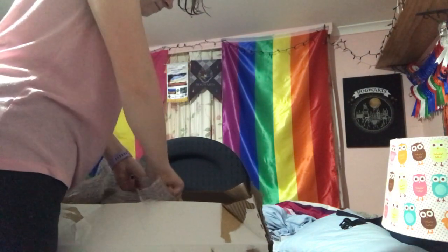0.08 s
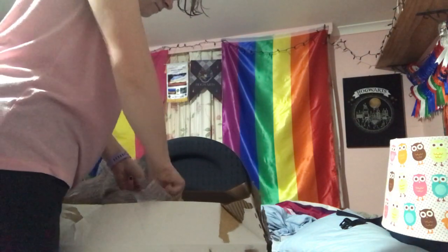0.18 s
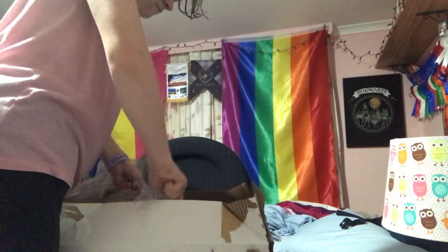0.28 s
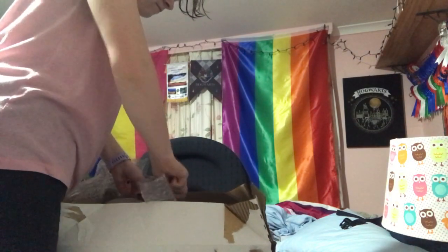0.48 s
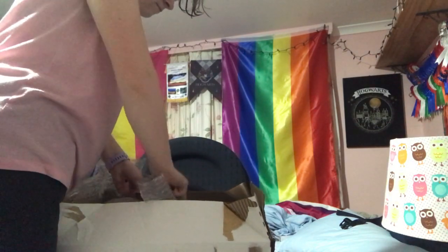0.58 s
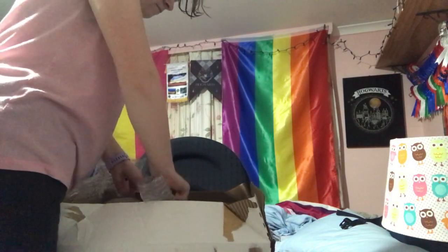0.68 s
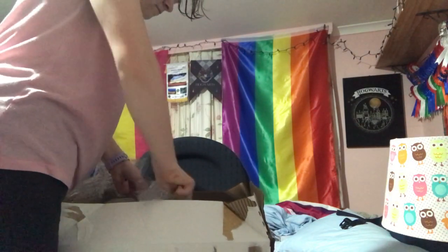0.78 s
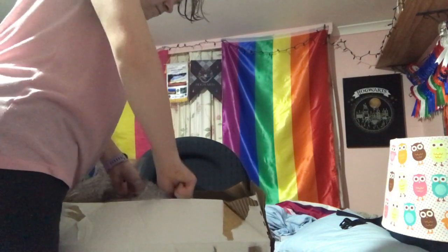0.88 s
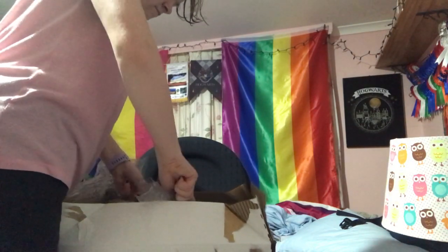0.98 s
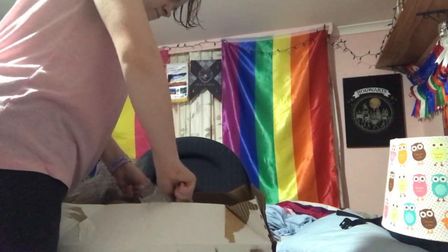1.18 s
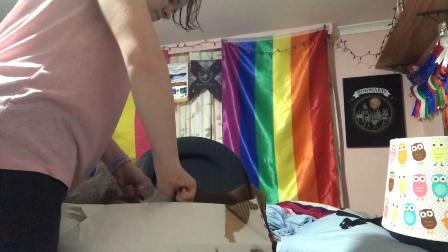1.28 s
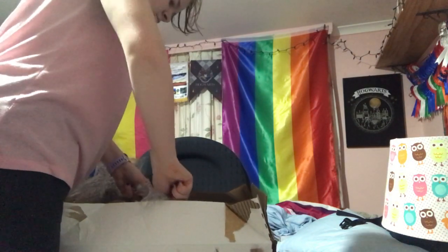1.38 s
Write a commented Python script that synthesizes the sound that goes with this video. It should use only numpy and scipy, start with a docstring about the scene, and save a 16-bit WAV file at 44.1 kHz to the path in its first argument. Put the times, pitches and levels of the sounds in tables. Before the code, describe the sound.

Packing paper crinkles and snaps in a cardboard box, with dull knocks on its walls

```python
"""Hands pull packing paper about in a cardboard box in a small furnished bedroom, near a camera.
Over a quiet floor of filtered noise, the paper first rustles softly: dense tiny crackles on a smooth hiss.
Near 0.2 s it grows loud; creases snap as pops with noise bursts, and knocks ring the box dully.
The rustle sinks away, bursts out again near 0.79 s, then goes on more softly with small snaps and knocks.
The room answers throughout with a short tail of fading noise."""
import sys
import numpy as np
from scipy import signal
from scipy.fft import rfft, irfft, next_fast_len
from scipy.io import wavfile
from scipy.ndimage import map_coordinates

SR = 44100
rng = np.random.default_rng(int(sys.argv[2]) if len(sys.argv) > 2 else 0)


def boost_factor(decibels):
    """Convert a level in decibels to a linear amplitude factor."""
    exponent = np.asarray(decibels, float) / 20
    return 10 ** exponent


def unload_audio(sound):
    """Save the sound as a 16-bit wav file, at the path given as the first command line argument."""
    columns = np.transpose(np.atleast_2d(sound))
    # keep every value between -1 and 1, then stretch to whole-number steps
    steps = np.round(np.clip(columns, -1, 1) * 32767)
    wavfile.write(sys.argv[1], SR, steps.astype(np.int16))


N = 61740


def unit(x):
    """Bring to rms 1."""
    return x / np.sqrt(np.mean(x ** 2) + 1e-20)


def along(points, hz):
    """Read a curve of (f/Hz, value) points on a log frequency axis."""
    f, v = np.transpose(points)
    return np.interp(np.log(hz + 1), np.log(f + 1), v)


def coloured(x, gain):
    """Filter x to the given gain of frequency, with no sound before its cause (minimum phase)."""
    m = 2 * next_fast_len(N // 2 + 4096)
    cepstrum = irfft(np.log(gain(np.fft.rfftfreq(m, 1 / SR)) + 1e-6), m)
    cepstrum[1:m // 2] *= 2
    cepstrum[m // 2 + 1:] = 0
    return irfft(rfft(x, m) * np.exp(rfft(cepstrum)), m)[:N]


def wobble(rate):
    """A smooth random curve, rate knots a second."""
    knots = rng.standard_normal(int(N * rate / SR) + 4)
    return map_coordinates(knots, [np.arange(N) * rate / SR])


def place(times, sounds):
    """Sum one row of samples per event at its time."""
    start = np.round(np.asarray(times) * SR).astype(int)[:, None]
    at = start + np.arange(sounds.shape[1])
    return np.bincount(at.ravel(), sounds.ravel(), N + SR)[:N]


# Colour of the quiet room tone: f/Hz, relative level/dB per Hz
FLOOR_COLOUR = [(15, -48), (25, 8.5), (130, 0), (223, -5), (1130, -11.5), (1940, -16.5), (2840, -21),
                (10400, -25), (12200, -24), (16000, -28)]


def room_tone():
    """The quiet floor: steady noise, strongest in the bass."""
    noise = coloured(rng.standard_normal(N), lambda hz: boost_factor(along(FLOOR_COLOUR, hz)))
    floor_db = -59  # rms, before the microphone
    return boost_factor(floor_db) * unit(noise)


# How long the room rings: f/Hz, time to fall by 60 dB/s
ROOM_DECAY = [(200, 0.37), (1500, 0.17), (6000, 0.11), (14000, 0.42)]


def room(x):
    """The room's answer: a scattered, fading tail, drawn anew for every tenth of a second of sound."""
    room_db, gap_s = -5.5, 0.003  # tail energy against the direct sound; wait before the tail
    out, step = np.zeros(N + 2 * SR), SR // 10
    gap = round(gap_s * SR)
    for a in range(0, N, step):
        hz, t, z = signal.stft(rng.standard_normal(SR // 3), SR, nperseg=256)
        fade = boost_factor(-60 * t / along(ROOM_DECAY, hz)[:, None])
        tail = signal.istft(z * fade, SR, nperseg=256)[1]
        wet = signal.fftconvolve(x[a:a + step], tail / np.linalg.norm(tail))
        out[a + gap:][:len(wet)] += wet
    return boost_factor(room_db) * out[:N]


# Ways the box can ring: f/Hz, relative level/dB, time to fall by 60 dB/s
BOX_MODES = [(68, -4.5, 0.076), (100, -11.5, 0.047), (156.8, -9, 0.076), (245, 0, 0.077), (303.5, 1, 0.047),
             (453.7, 0.5, 0.067), (527.3, 3.5, 0.052), (620, 4.5, 0.054), (800, 5.5, 0.037),
             (976, 7, 0.021), (1200, 9.5, 0.03), (1380, 6.5, 0.038), (1757, 8.5, 0.027), (2730, 5, 0.018)]
# Knocks on the box: t/s, relative peak level/dB, centre of the modes it excites f/Hz
BOX_KNOCKS = [(0.2072, -23.5, 1260), (.2085, -23, 435), (.228, -24, 1200), (0.2536, -47, 1320),
              (.2595, -11, 456), (.272, -20, 527), (.288, -17, 245), (.313, -17.5, 875),
              (0.346, -25.5, 245), (.356, -24.5, 510), (.409, -37, 504), (.7425, -23, 800),
              (.752, -36.5, 310), (0.7847, -16, 1420), (.787, -16.5, 624), (.798, -24, 530),
              (.803, -31, 116.6), (.822, -43, 620), (.848, -28, 830), (.854, -24.5, 463), (.862, -30, 141),
              (0.897, -30, 249), (.932, -32, 510), (.938, -27.5, 160), (.947, -31, 100), (1.001, -37, 307),
              (1.021, -47, 103), (1.142, -35.5, 630), (1.149, -36, 890), (1.351, -47, 68)]


def knocks():
    """Each knock rings the box modes anew; those near its centre most."""
    knock_db, blow_spread_db = -7.5, 2.5  # added to every knock's level; random spread of each mode
    reach_oct = 0.37  # how far round its centre a knock excites modes
    s, db, centre_hz = [c[:, None, None] for c in np.transpose(BOX_KNOCKS)]
    hz, mode_db, t60 = [c[:, None] for c in np.transpose(BOX_MODES)]
    draw = rng.standard_normal((len(s), 3, len(BOX_MODES), 1))
    t = np.arange(SR // 6) / SR
    nearness = 1 / (1 + (np.log2(hz / centre_hz) / reach_oct) ** 4)
    level = boost_factor(mode_db + blow_spread_db * draw[:, 0]) * nearness
    # pitch and starting phase vary a little from knock to knock
    phase = 2 * np.pi * hz * (1 + 0.011 * draw[:, 1]) * t + 1.32 * draw[:, 2]
    ring = np.sin(phase) * boost_factor(-60 * t / t60)
    blow = (level * ring).sum(1) * (1 - np.exp(-t / 0.0011))  # soft onset, 1.1 ms
    blow = blow / np.abs(blow).max(1, keepdims=True)
    return place(s[:, 0, 0], boost_factor(db[:, 0] + knock_db) * blow)


def box_gain(hz):
    """The box's resonances as one response; neighbouring modes have opposite signs."""
    total = 0
    for k, (f, db, t60) in enumerate(BOX_MODES):
        damping = 1j * hz * 6 / t60
        total = total + (-1) ** k * boost_factor(db) * damping / (f * f - hz * hz + damping)
    return abs(total)


def crackle():
    """Clumped crackles, some sharp and some pitched, on a smooth sliding hiss; spectrally flat."""
    crackles_per_s, size_spread_db = 3000, 5.5
    pitched_db, smooth_db = -4, -2  # pitched crackles and hiss, against the sharp crackles
    clump_db, pitched_ms = 2.5, 4  # strength of the clumping; pitched crackles fade within about this time
    draw, t = rng.random((6000, 4)), np.arange(192) / SR
    times = np.cumsum(-np.log(1 - draw[:, 0])) / crackles_per_s
    size_db = size_spread_db * np.minimum(-np.log(1 - draw[:, 1]), 2.8)
    size = boost_factor(size_db) * (times < N / SR)  # silence those past the end
    times = np.minimum(times, N / SR)
    life_s = 0.0015 + 0.0017 * draw[:, 2:3]  # to -60 dB
    sharp = boost_factor(-60 * t / life_s) * rng.standard_normal((6000, 192))
    swell = t / (pitched_ms / 1000) * 8
    tone = np.sin(np.pi * SR * draw[:, 3:] * t)  # each at its own random pitch
    pitched = swell * np.exp(1 - swell) * tone
    sharp = unit(place(times, size[:, None] * sharp))
    pitched = unit(place(times, size[:, None] * pitched))
    hiss = rng.standard_normal(N)
    mix = unit(sharp + boost_factor(pitched_db) * pitched + boost_factor(smooth_db) * hiss)
    return mix * boost_factor(clump_db * wobble(60.89))


def wall_rub():
    """Paper rubbing on the box wall: crackles heard through the box's resonances, dulled above 900 Hz."""
    return unit(coloured(crackle(), lambda hz: box_gain(hz) / (1 + (hz / 900) ** 2)))


# Creases snapping: t/s, relative level/dB, pitch f/Hz, relative treble crack level/dB against the body,
# length to -60 dB/ms (held between 4 and 30 when played)
CREASE_SNAPS = [(0.029, -32, 2300, -23, 13.5), (0.0359, -35.5, 3130, -25, 12), (0.042, -34.5, 3520, -1, 17),
                (0.0512, -36, 1290, -27.5, 30), (0.088, -31.5, 3530, -1.5, 10.5),
                (0.123, -34, 2320, -20, 14), (0.1358, -29.5, 2300, -27, -1), (0.1414, -42, 2200, -15, 12),
                (0.1505, -42, 1730, 6.5, 19), (0.1562, -34, 1390, 1, 13), (0.208, -11, 1820, -21, 7),
                (0.2146, -27, 1170, -30, 20), (0.228, -21, 1180, -34, 13), (0.256, -5.5, 1256, -9, 4.5),
                (0.2577, -8, 2530, -22, 12.5), (0.2732, -17, 2590, 4, 3), (0.2993, -21.5, 3090, -12, 30),
                (0.3066, -19.5, 2570, -34, 25), (0.3136, -29, 1950, -4, 10), (0.3644, -25.5, 1120, -24, 13),
                (0.3885, -35.5, 2220, 5.5, 13), (0.3979, -30.5, 3200, -3.5, 18),
                (0.4095, -31, 1200, -1, 17), (0.466, -35, 4040, -1, 14), (0.4805, -36, 3070, -1, 24),
                (0.5082, -37, 2000, -9, 15), (0.5282, -33.5, 6000, -6, 9), (0.5332, -36.5, 1380, -14, 22),
                (0.601, -50, 3480, -13, 12), (0.6255, -48.5, 3480, 1, 10), (0.655, -50, 3500, -10, 7),
                (0.6815, -46, 2200, -12, 25), (0.741, -29, 1630, -38, 10.5), (0.749, -30, 1630, -11, 4),
                (0.7687, -36, 1610, -27, 2), (0.7862, -14.5, 1440, -22, 12), (0.855, -22.5, 2100, -10, 31),
                (0.906, -39.5, 1780, 6, 9), (0.9325, -38, 1220, -0.5, 25), (1.0057, -40.5, 1520, -2.5, 25),
                (1.1036, -47, 1700, 0, 22), (1.1315, -34, 3060, 4, 3), (1.196, -36.5, 3260, 1, 9),
                (1.216, -39, 2680, 0, 8), (1.2482, -33, 3160, 0, 17), (1.306, -41, 1780, 4, 12),
                (1.398, -30.5, 1850, -8, 25)]


def snaps():
    """Each crease gives way as a pop and a short rough burst round its own pitch, with a treble crack."""
    snap_db, noise_db, crack_db = -4.5, -8.5, 5.5  # added to all snaps, to the burst, to the cracks
    width, rise_s, crack_hz = 0.42, 0.00031, 5160  # burst half-width over pitch; onset; crack's lower edge
    s, db, hz, treble_db, life_ms = [c[:, None] for c in np.transpose(CREASE_SNAPS)]
    t = np.arange(1400) / SR
    noise = rng.standard_normal((len(s), 2, len(t)))
    f = np.fft.rfftfreq(len(t), 1 / SR)
    burst = irfft(rfft(noise[:, 0]) / (1 + ((f - hz) / (width * hz)) ** 4), len(t))
    burst = burst / burst.std(1, keepdims=True)
    pop = np.sin(2 * np.pi * hz * t) * boost_factor(-4 * hz * t)  # loses 4 dB a cycle
    treble = irfft(rfft(noise[:, 1]) * f ** 2 / (f ** 2 + crack_hz ** 2), len(t))
    crack = boost_factor(treble_db + crack_db) * treble
    life_s = np.clip(life_ms / 1000, .004, .03)
    shape = boost_factor(-60 * t / life_s) * (1 - np.exp(-t / rise_s))
    # the snap keeps little bass: two gentle cuts below a quarter of its pitch
    no_bass = (1j * f / (1j * f + hz / 4)) ** 2
    body = irfft(rfft((pop + boost_factor(noise_db) * burst) * shape) * no_bass, len(t))
    body = body / np.abs(body).max(1, keepdims=True)
    return place(s[:, 0], boost_factor(db + snap_db) * (body + crack * shape))


# Colour of the rustling sheet: f/Hz, relative level/dB per Hz
PAPER_COLOUR = [(150, -51.5), (250, -15), (452, 0), (674, -10), (775, -16.5), (1140, -8), (3060, -5),
                (6140, -12), (14900, -19.5), (16000, -22)]


def paper_sheet(tilt_db):
    """The sheet's own rustle: crackles in the paper's colour, with the treble lifted or cut by tilt_db."""
    sheet = unit(coloured(crackle(), lambda hz: boost_factor(along(PAPER_COLOUR, hz))))
    high = signal.sosfilt(signal.butter(1, 4000, "high", fs=SR, output="sos"), sheet)
    return sheet + (boost_factor(tilt_db) - 1) * high


# The pull, in one list of rows per stretch: t/s, relative rustle level/dB,
# relative pressure on the box wall level/dB, treble lift level/dB
PULL_STRETCHES = [
    [(0, -46.5, 3, -0.5), (.05, -49, 4.5, 3.5), (.12, -50.5, 5.5, 2), (.19, -49.5, 5, -1),
     (.204, -43.5, 3, -4)],
    [(.2078, -29.5, -1, 1.5), (.222, -33.5, 4, 4), (.25, -40.5, 6.5, 2)],
    [(.2553, -21.5, -2.5, 3.5), (.265, -31.5, 7.5, 3.5), (.284, -36, -5.5, 3), (.312, -37, 10, -1),
     (.325, -45.5, -7, 1.5), (.4, -47.5, 0, -0.5), (.45, -57, 8.5, 8.5), (.538, -55, 1.5, -6),
     (.574, -64, -3, -8), (.676, -72, -7, 5)],
    [(.682, -60.5, 6, 4), (.718, -61.5, 13, -1), (.744, -41, 6.5, -0.5), (.78, -43.5, 7.5, 3)],
    [(.785, -39, 13.5, 5), (.819, -52, 10, 7.5), (.835, -41.5, 3.5, 3), (.859, -37.5, 3, 2.5),
     (.875, -45.5, -1, 0), (.897, -52, 0, 0), (.98, -56, 9.5, 3.5), (1.04, -53, 5, 1.5),
     (1.08, -63, 6.5, 3.5), (1.12, -56, 2, 0.5)],
    [(1.13, -59.5, 12, 7), (1.15, -50.5, 12.5, 6), (1.175, -52.5, -0.5, 1), (1.215, -57.5, 4, 4.5),
     (1.25, -53.5, 3, 3), (1.27, -57, 3.5, 5), (1.31, -54.5, 6, -1.5), (1.39, -58, 11, 8)],
]


def rustle():
    """The pull sets level and brightness of the paper and how hard it rubs the box wall."""
    step_s = 0.0006
    paper_db, rub_db = -0.5, -7.5
    # hold a stretch's last values until just before the next one's rows, so that the rustle steps there
    pairs = zip(PULL_STRETCHES, PULL_STRETCHES[1:])
    held = [[(after[0][0] - step_s, *before[-1][1:])] for before, after in pairs]
    rows = np.vstack(PULL_STRETCHES + held)
    s, *cols = rows[np.argsort(rows[:, 0])].T
    level_db, wall_db, tilt_db = [np.interp(np.arange(N) / SR, s, c) for c in cols]
    paper = boost_factor(paper_db) * paper_sheet(tilt_db)
    wall = boost_factor(rub_db + wall_db) * wall_rub()
    return boost_factor(level_db) * (paper + wall)


def scene():
    """Paper and box in the room, over the room tone."""
    near = rustle() + snaps() + knocks()
    return (near + room(near) + room_tone())[None]


def roll_off(x):
    """The treble ends steeply here."""
    return signal.sosfilt(signal.butter(12, 16390, fs=SR, output="sos"), x)


# Colour of the camera's microphone: f/Hz, gain level/dB
MIC_COLOUR = [(20, -35), (40, -4.5), (80, -3), (6000, -3), (9000, -7), (10500, -13), (12000, -11.5),
              (16000, -16.5)]


def record(dry):
    """The camera's microphone colours the sound and adds its own hiss; a steep filter limits the band."""
    hiss_db, top_hz = -79, 15740
    heard = coloured(dry[0], lambda hz: boost_factor(along(MIC_COLOUR, hz)))
    heard = heard + boost_factor(hiss_db) * rng.standard_normal(N)
    heard = signal.sosfilt(signal.ellip(10, .5, 50, top_hz, fs=SR, output="sos"), heard)
    return roll_off(heard[None])


dry = scene()
out = record(dry)
unload_audio(out)
```